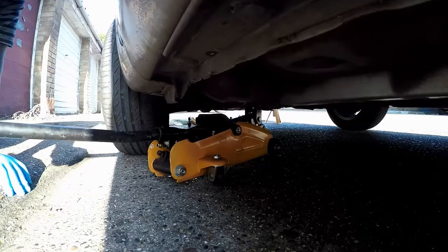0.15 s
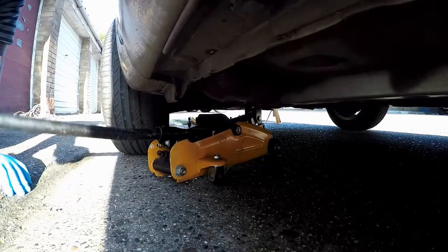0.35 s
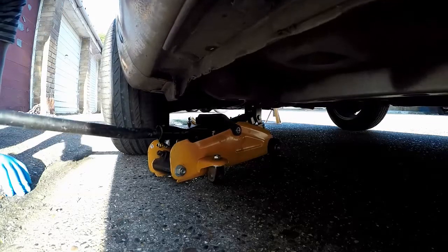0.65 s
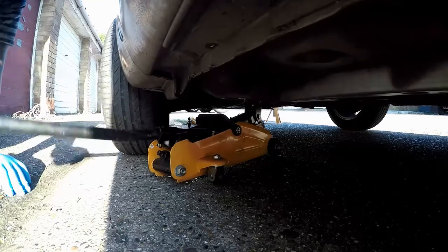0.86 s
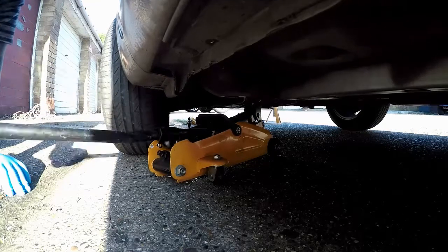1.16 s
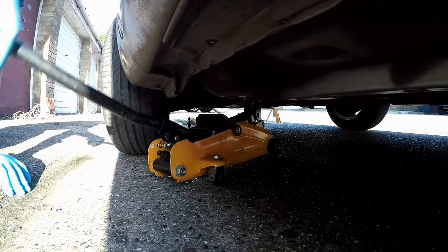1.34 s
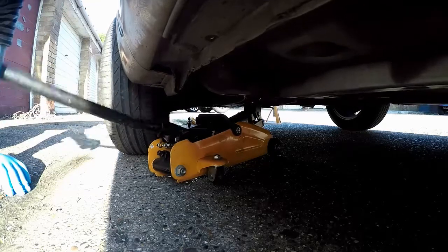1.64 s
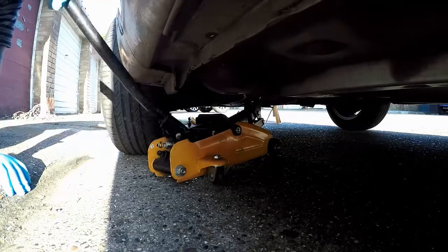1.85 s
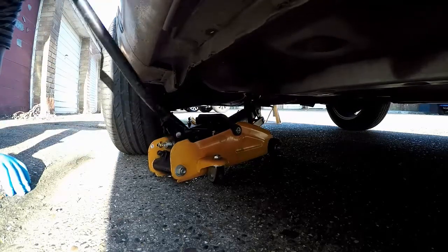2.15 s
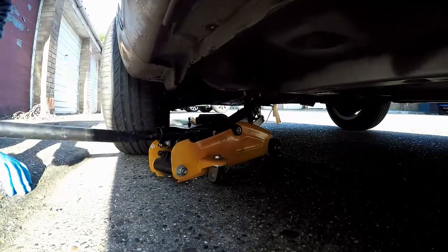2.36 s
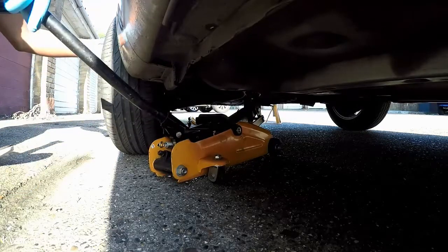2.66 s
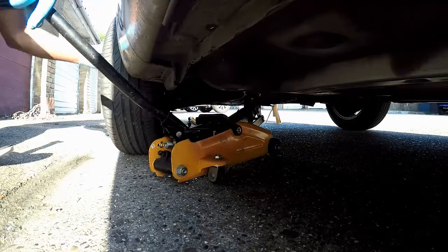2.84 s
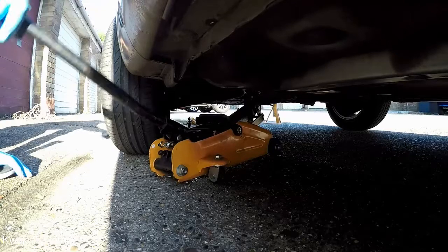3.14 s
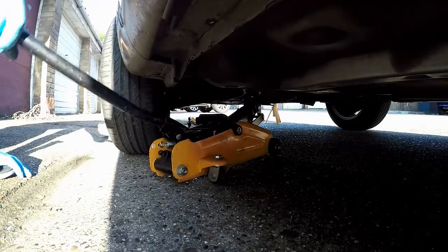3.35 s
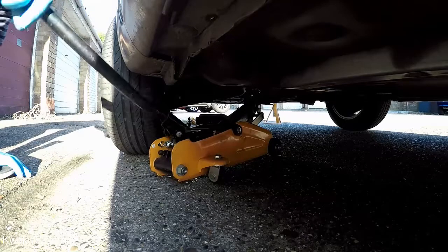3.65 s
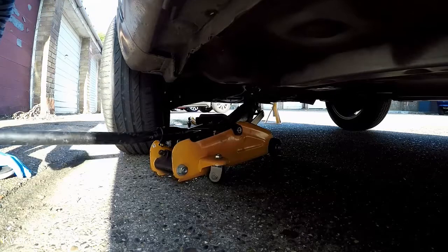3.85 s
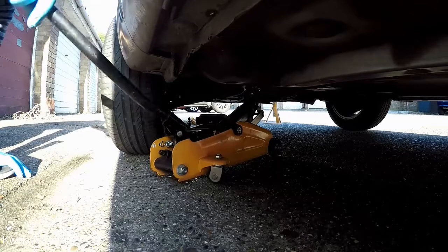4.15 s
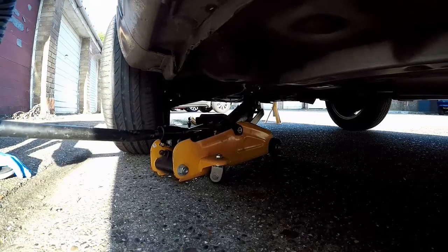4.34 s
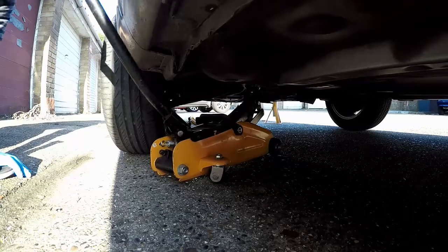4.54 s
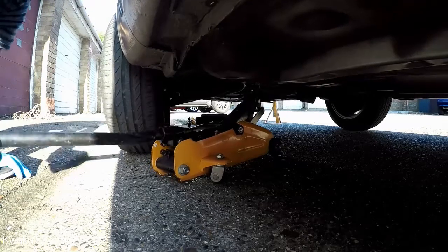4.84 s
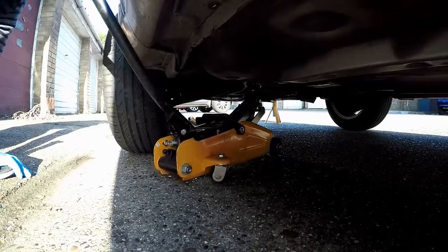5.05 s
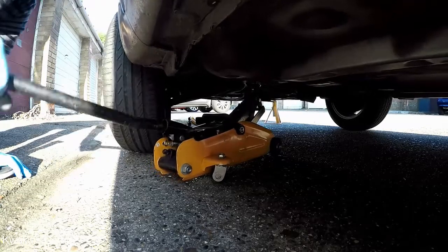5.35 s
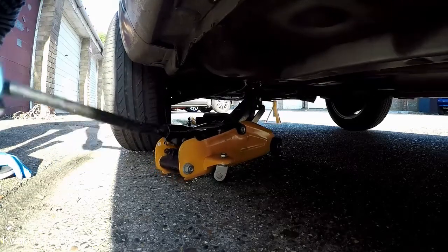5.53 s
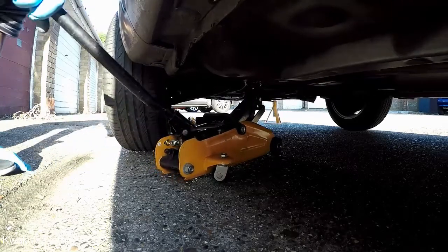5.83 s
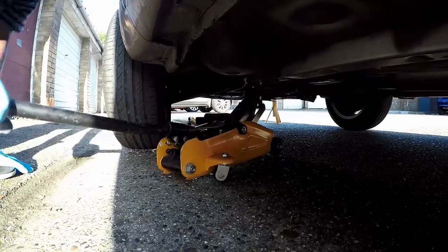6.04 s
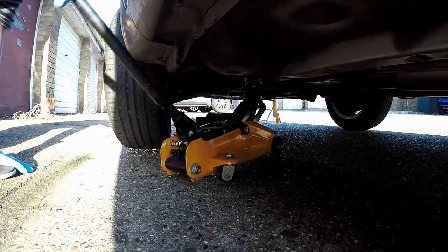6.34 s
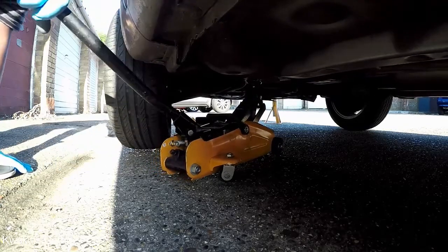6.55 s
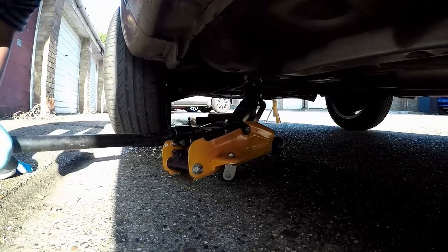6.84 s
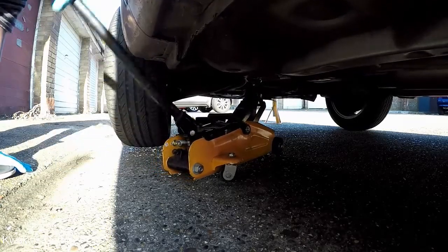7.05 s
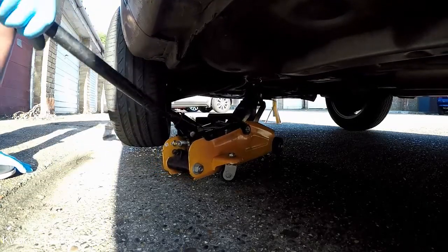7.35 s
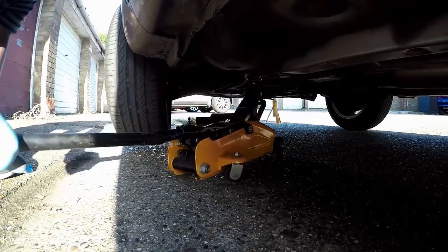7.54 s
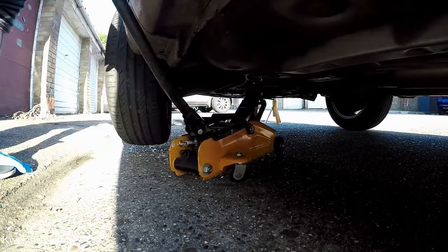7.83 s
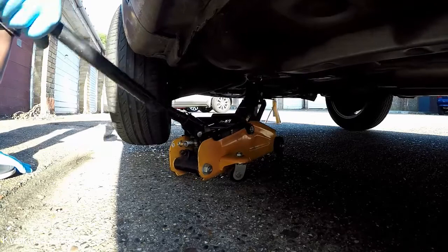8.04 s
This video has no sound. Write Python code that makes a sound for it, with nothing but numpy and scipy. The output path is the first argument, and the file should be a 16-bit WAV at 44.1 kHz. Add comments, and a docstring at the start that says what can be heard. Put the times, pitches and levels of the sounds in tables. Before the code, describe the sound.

Close, dry outdoor sound of a steel trolley jack being pumped under a car, over quiet steady air and a faint dull echo. From 0 to 2.6 s, rapid even strokes come about every quarter second: a rattly clack with a low thump, then a lighter knock and click as the lever swings back, with tiny hollow blips from the valve. From about 2.9 s the rhythm breaks up: soft scuffs, knocks, small clicks and sharper catches, the strongest near 3.75 s. Low, lumpy wind rumbles up from 4.2 s, peaking around 5 s and gone by 5.5 s, with a hard bang at 4.9 s. Clicks cluster near 5.4 s. Loud bangs with short metallic rings land at 6.0, 6.3 and 6.75 s, a barely audible thin squeak between 6.5 and 7 s. A catch and double thudding bang come at 7.4 to 7.55 s, then fading clicks, knocks and a faint scuff until about 8.2 s.

```python
"""Trolley jack under a car

A steel jack is pumped outdoors. Quick idle strokes clack and knock until the saddle meets the car; slower
strokes then bang the handle on its stop and set it ringing. Blows are short noise forces through
minimum-phase frame resonances; rings are damped sines, rubs are clumped random slips.
A gust of low, lumpy noise buffets the microphone over a steady noise bed and a faint echo."""
import sys
import numpy as np
from scipy import signal
from scipy.fft import rfft, irfft
from scipy.io import wavfile
from scipy.ndimage import uniform_filter1d

SR = 44100
rng = np.random.default_rng(int(sys.argv[2]) if len(sys.argv) > 2 else 0)


def output_pcm(signal):
    """Save a mono or channel-first signal as 16-bit PCM at the path in sys.argv[1].

    Samples are clipped to [-1, 1] before scaling.
    """
    pcm = np.clip(np.atleast_2d(signal).T, -1, 1) * 32767
    wavfile.write(sys.argv[1], SR, np.round(pcm).astype(np.int16))


N = 361179  # samples

# Levels in the tables are relative: each layer adds its own gain.
# outdoor background spectrum: (frequency [Hz], level [dB])
AIR_COLOUR = [(60, -3), (130, 5), (300, -7), (700, -13), (1500, -20), (3500, -25.5), (7000, -33),
              (15000, -41)]
AIR_RMS_DB = -48.5
# breeze with one gust: (time [s], level [dB])
WIND_LEVEL = [(0.0, -41.5), (1.34, -43), (1.85, -44.5), (2.39, -43), (4.05, -38.5), (4.19, -34), (4.3, -42),
              (4.42, -31), (4.6, -38), (4.92, -29), (5.03, -18.5), (5.2, -22.5), (5.34, -34.5),
              (5.9, -45.5), (8.19, -45.5)]
# spectrum of air moving on the microphone: (frequency [Hz], level [dB])
WIND_COLOUR = [(10, -12), (30, 7.5), (60, 0), (110, -6.5), (190, -15.5), (300, -29), (600, -48),
               (2000, -76)]
# echo between car floor, ground and garages: (frequency [Hz], t60 [s])
YARD_DECAY = [(150, 1), (500, 1), (1200, 0.93), (2500, 0.4), (5000, 0.28), (11000, 0.039)]

# late blips of the oil valve: (time [s], level [dB])
VALVE_BLIPS = [(1.263, -31.5), (2.15, -29)]
VALVE_HZ, VALVE_T60_S = 825, 0.083

# lever swings back through its free play: (time [s], travel [s], knock [dB], click [dB])
LEVER_RETURNS = [(0.133, .062, -31.5, -33), (0.369, 0.07, -28, -34), (0.653, 0.04, -31.5, -28.5),
                 (0.863, 0.078, -28, -29.5), (1.142, 0.065, -31, -26.5), (1.403, 0.07, -31.5, -27.5),
                 (1.686, 0.068, -28, -27.5), (1.98, 0.091, -27.5, -27.5), (2.371, 0.055, -34.5, -29),
                 (3.023, 0.097, -32, -30), (3.401, 0.085, -33.5, -34), (3.818, 0.12, -40, -29),
                 (4.351, 0.076, -57, -29.5), (5.647, 0.059, -27.5, -31)]
# the pin touches lightly before it seats, sliding all the way
TOUCH_LEAD_S, TOUCH_DB, SLIDE_DB = 0.019, -10.5, -49.5
# the lever bounces once after its knock
REBOUND_S, REBOUND_DB = 0.026, -11
KNOCK_TILT_DB_PER_OCT, CLICK_TILT_DB_PER_OCT, SLIDE_TILT_DB_PER_OCT = -2, 3, -6.5
# slack is taken up with a click just before the stop
SLACK_LEAD_S, SLACK_DB = 0.013, -18.5

# handle scuffs in socket and glove: (time [s], length [s], level [dB], tilt [dB/octave])
SCUFFS = [(2.93, 0.092, -50.5, 0), (3.17, 0.087, -53, -2.5), (3.36, 0.28, -51, -4), (3.76, 0.17, -44, -3.5),
          (4.21, 0.37, -48.5, -3.5), (4.68, 0.54, -49.5, -2), (4.81, 0.18, -44, -3),
          (5.37, 0.23, -43.5, -1), (5.95, 0.486, -50.5, 1.5), (6.67, 0.19, -44, 0), (7.06, 0.098, -49, 0.5),
          (7.49, 0.048, -25.5, 1.5), (7.68, 0.036, -44.5, 2), (8.09, 0.12, -47.5, 2)]
# rubbing spectrum: (frequency [Hz], level [dB])
RUB_COLOUR = [(150, 2), (450, 2.5), (800, 5.5), (1500, 2.5), (2150, 5.5), (2700, 4), (4300, 7.5),
              (7000, -0.5), (10000, -8.5), (15000, -20)]

# damped frame resonances: (frequency [Hz], width [Hz], idle lift [dB], loaded lift [dB])
FRAME_MODES = [(183, 73, 3, 6.5), (463, 53, 7, 4), (807, 82, 2.5, -2.5), (1137, 90, 1, 3),
               (1428, 470, 4, -3), (1920, 69, 3.5, 5), (2170, 220, -4.5, 7.5), (2593, 88, 0.5, -2.5),
               (2930, 75, 1.5, 3.5), (3450, 79, 0.5, 3.5), (4090, 380, -4.5, -2), (5050, 400, 0.5, -2),
               (5910, 190, 4, -1), (9700, 1300, 4, -2.5)]
LOADING_S = (2.7, 5.2)  # start and end of the car's weight coming onto the saddle
# decay of a blow in the frame: (frequency [Hz], t60 [s])
FRAME_DECAY = [(150, 0.13), (400, 0.094), (900, 0.071), (2000, 0.064), (4500, 0.038), (10000, 0.034)]
# bounce of the jack on the ground: (frequency [Hz], level [dB], t60 [s])
BOUNCE_MODES = [(38.3, 2.5, 0.17), (72.3, 3, 0.13), (118.4, -5, 0.11), (184, -13, 0.046)]
# hollow ring of the handle's socket: (frequency [Hz], level [dB], t60 [s])
SOCKET_MODES = [(804, -6, 0.074), (1453, -13.5, 0.036), (2470, -9, 0.066)]

# free ring of the handle tube: (frequency [Hz], level [dB], t60 [s])
HANDLE_MODES = [(398, -18.5, 0.5), (555, -22.5, 0.87), (950, -19, 0.34), (1405, -11, 0.28),
                (1890, -16.5, 0.32), (2148, -4.5, 0.29), (2783, -8.5, 0.2), (3405, -15, 0.48),
                (3740, -14.5, 0.47), (4100, -21, 0.38), (4400, -23, .4), (4580, -22, 0.21),
                (5180, -17.5, 0.53)]
# first bending mode of the tube: (frequency [Hz], level [dB], t60 [s])
BEND_MODE = [(189, 1, 0.39)]
# crowded weaker modes of the tube: (frequency [Hz], level [dB])
SHIMMER_COLOUR = [(300, 17), (1500, 0), (2100, 11), (5300, 10.5), (5500, -16.5)]
SHIMMER_DB, SHIMMER_T60_S = -5, 0.42
STIR_DB = -30.5  # ring set off by a clack or knock, relative to its level

# handle snaps in its socket under load: (time [s], level [dB], tilt [dB/octave])
CLICKS = [(3.453, -37.5, 1.5), (3.543, -42.5, 3), (3.805, -36, 2.5), (3.914, -37, -1), (3.995, -35, 5),
          (4.056, -40.5, 1.5), (4.354, -39.5, 3), (4.397, -48, 3.5), (4.49, -39.5, 0.5), (4.546, -43, 1.5),
          (4.617, -46.5, 3.5), (4.822, -41.5, -1), (4.986, -37, 6), (5.07, -34, 2.5), (5.318, -44, 5),
          (5.349, -42, 4), (5.412, -34.5, 2.5), (5.44, -28.5, 1.5), (5.493, -34, 2.5), (5.557, -34, 4),
          (6.154, -33, 3), (6.246, -30.5, 1.5), (6.312, -38, 7.5), (6.438, -35, 9), (6.695, -37, 3.5),
          (6.96, -32.5, 6.5), (7.034, -31.5, 0.5), (7.125, -36.5, 6), (7.653, -27.5, 7.5),
          (7.771, -36.5, 5.5), (7.856, -37, 6.5)]
# frame rocks on its wheels as the handle turns round: (time [s], level [dB])
KNOCKS = [(0.913, -27), (2.128, -35), (2.493, -29), (3.059, -32.5), (3.294, -33), (3.664, -37),
          (4.851, -32), (5.013, -24.5), (5.745, -25.5), (6.201, -33.5), (6.487, -30.5), (7.177, -26.5),
          (7.531, -26.5), (7.794, -29.5), (7.897, -31)]
# lever ends an idle stroke: (time [s], level [dB], tilt [dB/octave], ping [Hz], thud [dB])
CLACKS = [(0.063, -28, -2.5, 1430, -26.5), (0.303, -27.5, -2.5, 1600, -26), (0.56, -27, -3.5, 1460, -28.5),
          (0.799, -25, -3.5, 850, -22), (1.05, -25, -2.5, 740, -26.5), (1.317, -23.5, -3.5, 6100, -19.5),
          (1.59, -24.5, -4.5, 2000, -27), (1.886, -24.5, -3, 9900, -24), (2.202, -24, -3, 2550, -26),
          (2.571, -24.5, -5, 2740, -26)]
# raised handle catches in its socket: (time [s], level [dB], tilt [dB/octave], ping [Hz], thud [dB])
CATCHES = [(3.258, -27, 0.5, 9700, -30.5), (3.626, -24.5, 0, 9700, -54), (3.744, -16.5, 1.5, 1680, -37),
           (4.085, -28, 0.5, 1000, -25), (4.576, -30.5, -0.5, 710, -26), (7.428, -20, -1.5, 1270, -59)]
# handle meets its stop:
# (time [s], level [dB], tilt [dB/octave], ping [Hz], thud [dB], ring [dB], lifted note [Hz])
BANGS = [(4.907, -14.5, 1.5, 4450, -34, -48.5, 3405), (5.978, -15.5, 2.5, 670, -60, -35.5, 2148),
         (6.032, -24, -0.5, 2120, -36.5, -44.5, 2783), (6.263, -15.5, 2, 4560, -17, -30.5, 1890),
         (6.755, -15, 2.5, 1790, -49, -41, 3405), (7.495, -20, 2, 2150, -20, -29.5, 1405),
         (7.551, -17, 2.5, 3440, -19, -40.5, 2148)]
# contact spectra: (frequency [Hz], level [dB])
CLICK_COLOUR = [(60, -24.5), (200, 8.5), (340, 5.5), (500, 1.5), (780, 10), (1100, 1), (1450, -2.5),
                (2200, -5.5), (3400, -3.5), (5000, -9), (6800, -14.5), (10000, -21.5), (14500, -29)]
KNOCK_COLOUR = [(60, 9), (200, 0.5), (340, -2), (500, 0.5), (780, 1.5), (1100, -5.5), (1450, -1.5),
                (2200, -6), (3400, -3.5), (5000, -9), (6800, -17), (10000, -24), (14500, -31)]
CLACK_COLOUR = [(60, -35), (200, -6.5), (340, -7.5), (500, -7.5), (780, 3.5), (1100, -2.5), (1450, -5),
                (2200, 0), (3400, 0.5), (5000, 1), (6800, -5.5), (10000, -5), (14500, -1)]
CATCH_COLOUR = [(60, -21), (200, -0.5), (340, -3.5), (500, -2.5), (780, 4), (1100, -3), (1450, -5.5),
                (2200, -2.5), (3400, 0), (5000, -7), (6800, -12.5), (10000, -18.5), (14500, -16.5)]
BANG_COLOUR = [(60, -18.5), (200, 8.5), (340, -4.5), (500, -7), (780, 4), (1100, -2), (1450, 0.5),
               (2200, -6), (3400, -4.5), (5000, -8), (6800, -14.5), (10000, -23.5), (14500, -27.5)]
HIT_SIZE, HIT_PEAK_S = 5120, 0.02  # length [samples], place of the bite in it
# ping of the struck part; light contacts draw theirs from a range
PING_DB, PING_OCTAVES = 8, 0.16
KNOCK_PING_HZ, CLICK_PING_HZ, GRAIN_PING_HZ = (570, 1630), (2000, 5600), (870, 7040)
EDGE_HZ = 15650  # output band limit


def amp(db):
    """dB to gain."""
    return 10 ** (np.asarray(db) / 20)


def evened(x):
    """Scales to unit rms."""
    return x / np.sqrt(np.mean(x ** 2) + 1e-20)


def decay(t, t60_s):
    """Exponential fall of 60 dB in t60_s."""
    return np.exp(-np.log(1000) * t / t60_s)


def read(points, hz):
    """Spectrum joined by straight lines over log frequency."""
    f, value = np.transpose(points)
    return np.interp(np.log(hz + 1), np.log(f + 1), value)


def level(curve):
    """dB curve as a gain for every sample."""
    s, db = np.transpose(curve)
    return amp(np.interp(np.arange(N) / SR, s, db))


def add(mix, s, sound):
    """Adds a sound into the mix at a time, cut at the end."""
    part = mix[max(0, round(s * SR)):][:len(sound)]
    part += sound[:len(part)]


def coloured(x, points):
    """Gives x a spectrum, at unit rms."""
    gain = amp(read(points, np.fft.rfftfreq(len(x), 1 / SR)))
    return evened(irfft(rfft(x) * gain, len(x)))


def drift(per_s):
    """Smooth random curve of unit rms: noise averaged twice."""
    size = int(SR / per_s)
    once = uniform_filter1d(rng.standard_normal(N), size, mode="wrap")
    return evened(uniform_filter1d(once, size, mode="wrap"))


def causal(x, db):
    """Minimum-phase filter: resonances ring only after the blow."""
    cepstrum = irfft(np.log(amp(db)))
    half = len(cepstrum) // 2
    cepstrum[1:half] *= 2
    cepstrum[half + 1:] = 0
    return irfft(rfft(x) * np.exp(rfft(cepstrum)))


def dying_noise(decays, size):
    """Crowded modes or echoes: each band dies at its own speed, with like energy per Hz."""
    t, hz = np.arange(size) / SR, np.fft.rfftfreq(size, 1 / SR)
    centres, t60s = np.transpose(decays)
    noise, out = rfft(rng.choice([-1., 1.], size)), np.zeros(size)
    for share, t60_s in zip(np.eye(len(centres)), t60s):
        weight = read(np.transpose([centres, share]), hz)
        out += irfft(noise * weight, size) * evened(decay(t, t60_s))
    return evened(out) / np.sqrt(size)


def ring(modes, seconds, detune):
    """Damped sines with random polarity and slightly random pitch."""
    t, out = np.arange(int(seconds * SR)) / SR, 0
    for (hz, db, t60_s), (pitch, side) in zip(modes, rng.standard_normal((len(modes), 2))):
        sine = np.sin(2 * np.pi * hz * (1 + detune * pitch) * t)
        out = out + np.sign(side) * amp(db) * sine * decay(t, t60_s)
    return out


def air():
    """Steady outdoor background: coloured noise."""
    return amp(AIR_RMS_DB) * coloured(rng.standard_normal(N), AIR_COLOUR)


def wind(gain_db, lumpy_db):
    """Low, lumpy buffeting: coloured noise under a drifting gain."""
    lumps = amp(gain_db + lumpy_db * drift(8.2))
    return lumps * level(WIND_LEVEL) * coloured(rng.standard_normal(N), WIND_COLOUR)


def yard(x, wet_db, delay_s):
    """Faint, dull echo: convolution with dying noise."""
    tail = np.zeros(SR)
    add(tail, delay_s, dying_noise(YARD_DECAY, SR))
    dull = signal.lfilter(*signal.butter(1, 5000, fs=SR), tail)
    return amp(wet_db) * signal.oaconvolve(x, dull)[:N]


def squeak(s, length_s, note_hz, db, width_hz):
    """A faint, narrow tone: noise through one narrow resonance, swelling and fading."""
    out, size = np.zeros(N), int(length_s * SR)
    peak = signal.iirpeak(note_hz, note_hz / width_hz, fs=SR)
    note = signal.lfilter(*peak, rng.standard_normal(size))
    add(out, s, amp(db) * evened(note) * np.hanning(size))
    return out


def valve(return_db):
    """Oil valve: a damped sine halfway through every return before loading, and at the late blips."""
    idle = [(s + travel_s / 2, return_db) for s, travel_s, *_ in LEVER_RETURNS if s < LOADING_S[0]]
    out = np.zeros(N)
    for s, db in list(VALVE_BLIPS) + idle:
        add(out, s, amp(db) * ring([(VALVE_HZ, 0, VALVE_T60_S)], 0.25, detune=0.03))
    return out


def frame(hz, s, spot_db=0):
    """Frame resonances in dB, changing as the weight comes on; spot_db scatters them at random."""
    load = np.interp(s, LOADING_S, [0, 1])
    scatter = spot_db * rng.standard_normal(len(FRAME_MODES))
    total = 0
    for (f, width, idle_db, loaded_db), spot in zip(FRAME_MODES, scatter):
        lift = (1 - load) * idle_db + load * loaded_db + spot
        total = total + lift / (1 + (2 * (hz - f) / width) ** 2)
    return total


def ping(hz, ping_hz):
    """Narrow lift, in dB, around the note of the struck part."""
    return PING_DB / (1 + (np.log2((hz + 1) / ping_hz) / PING_OCTAVES) ** 2)


def octaves_from_2k(hz):
    """Octaves from 2 kHz, held below 500 Hz, for spectral tilt."""
    return np.log2(np.maximum(hz, 500) / 2000)


def grain_bodies(count, tilt_db):
    """Slips on different spots ring the frame with different notes and brightness."""
    hz = np.fft.rfftfreq(HIT_SIZE, 1 / SR)
    notes = np.geomspace(*GRAIN_PING_HZ, count)
    tilts = rng.permutation(np.linspace(-tilt_db, tilt_db, count))
    return [causal(dying_noise(FRAME_DECAY, HIT_SIZE), ping(hz, note) + tilt * octaves_from_2k(hz))
            for note, tilt in zip(notes, tilts)]


def rub(scuffs, gain_db, grains_per_s, spread_db, smooth):
    """Tiny slips in uneven clumps, swelling and fading with each scuff."""
    sizes = amp(spread_db * np.minimum(rng.exponential(1, N), 3))
    slips = (rng.random(N) < grains_per_s / SR) * sizes * rng.choice([-1., 1.], N)
    bodies = grain_bodies(count=8, tilt_db=2.0)
    spot = rng.integers(0, len(bodies), N)
    grains = sum(signal.oaconvolve(slips * (spot == k), body)[:N] for k, body in enumerate(bodies))
    clumps = amp(3.5 * drift(110))
    friction = (evened(grains) + smooth * rng.standard_normal(N)) * clumps
    out = np.zeros(N)
    for s, length_s, db, tilt_db in scuffs:
        part = friction[round(s * SR):][:int(length_s * SR)]
        hz = np.fft.rfftfreq(len(part), 1 / SR)
        tilted = [(f, band_db + tilt_db * np.log2(f)) for f, band_db in RUB_COLOUR]
        colour = np.transpose([hz, read(tilted, hz) + frame(hz, s)])
        add(out, s, amp(db + gain_db) * coloured(part, colour) * signal.windows.tukey(len(part), 0.5))
    return out


def thuds(rows, modes, gain_db, shudder_db, shudder_t60_s):
    """Jack bounces on its wheels (damped sines) and shudders (dying low noise)."""
    out = np.zeros(N)
    band = signal.butter(2, (110, 280), "bandpass", fs=SR, output="sos")
    for s, _, _, _, thud_db, *_ in rows:
        bounce = ring(modes, 0.25, detune=0.03)
        low = signal.sosfilt(band, rng.standard_normal(len(bounce)))
        shudder = evened(low) * decay(np.arange(len(low)) / SR, shudder_t60_s)
        add(out, s, amp(thud_db + gain_db) * (bounce + amp(shudder_db) * shudder))
    return out


def knocked(knocks, modes, gain_db, detune):
    """Every knock sets a part ringing: the socket, or the whole jack on its wheels."""
    out = np.zeros(N)
    for s, db, _ in knocks:
        add(out, s, amp(db + gain_db) * ring(modes, 0.25, detune))
    return out


def handle(light_blows, gain_db, note_db, bend_db):
    """Tube rings after the stop with one note lifted, faintly after light blows; bangs also flex it."""
    out, t = np.zeros(N), np.arange(SR // 2) / SR
    strikes = [(s, ring_db, note_hz) for s, *_, ring_db, note_hz in BANGS]
    strikes += [(s, db + STIR_DB, 0) for s, db, *_ in light_blows]  # 0 Hz: no lifted note
    for s, ring_db, note_hz in strikes:
        modes = [(hz, db + note_db * (abs(hz - note_hz) < hz / 20), t60_s)
                 for hz, db, t60_s in HANDLE_MODES]
        shimmer = coloured(rng.standard_normal(len(t)), SHIMMER_COLOUR) * decay(t, SHIMMER_T60_S)
        tube = ring(modes, 0.5, detune=0.001)
        add(out, s, amp(ring_db + gain_db) * (tube + amp(SHIMMER_DB) * shimmer))
    bend = ring(BEND_MODE, 0.5, detune=0)
    for s, _, _, _, thud_db, *_ in BANGS:
        add(out, s, amp(thud_db + bend_db) * bend)
    return out


def returns():
    """Rows of knocks, clicks, slides: each return knocks, rebounds, slides, touches and seats."""
    knocks, clicks, slides = [], [], []
    for s, travel_s, knock_db, click_db in LEVER_RETURNS:
        seat_s = s + travel_s
        knocks.append((s, knock_db, KNOCK_TILT_DB_PER_OCT))
        knocks.append((s + REBOUND_S, knock_db + REBOUND_DB, 0))
        clicks.append((seat_s - TOUCH_LEAD_S, click_db + TOUCH_DB, CLICK_TILT_DB_PER_OCT))
        clicks.append((seat_s, click_db, CLICK_TILT_DB_PER_OCT))
        slides.append((s, travel_s, SLIDE_DB, SLIDE_TILT_DB_PER_OCT))
    return knocks, clicks, slides


def pinged(rows, range_hz):
    """Gives each light contact a random note within a range."""
    low, high = range_hz
    return [(*row, low * (high / low) ** u) for row, u in zip(rows, rng.random(len(rows)))]


def hit(s, colour, tilt_db, ping_hz, contact_s, body_db, scrape_db, scrape_s):
    """Rough steel slides in jerks, bites for a few ms, shakes the frame and rattles loose."""
    clock = np.arange(HIT_SIZE) / SR
    t, hz = clock - HIT_PEAK_S, np.fft.rfftfreq(HIT_SIZE, 1 / SR)
    rough = uniform_filter1d(rng.standard_normal(HIT_SIZE), size=3)  # sliding is duller than biting
    jerks = amp(4 * evened(uniform_filter1d(rng.standard_normal(HIT_SIZE), size=130)))
    # the bite is a cluster of tiny contacts
    bite = np.exp(-abs(t) / contact_s) * rng.standard_normal(HIT_SIZE) * jerks
    slide = amp(scrape_db) * jerks * np.clip(4 * (t + scrape_s) / scrape_s, 0, 1) * (t < 0)
    late_s = rng.uniform(0.0013, 0.0542, size=2)
    rattle = amp(-28.5) * sum(np.exp(-abs(t - late) / contact_s) for late in late_s)
    force = (bite + (slide + rattle) * rough) / np.linalg.norm(bite)
    body = dying_noise(FRAME_DECAY, HIT_SIZE) * np.minimum(clock / contact_s, 1)
    add(force, HIT_PEAK_S - contact_s / 2, amp(body_db) * body)
    # each blow lands on another spot, so it favours other resonances
    frame_db = frame(hz, s, spot_db=3)
    tone_db = read(colour, hz) + frame_db + ping(hz, ping_hz) + tilt_db * octaves_from_2k(hz)
    sound = causal(force, tone_db)
    return evened(sound) * np.sqrt(SR / 50 / HIT_SIZE)  # energy of unit rms over 20 ms


def hits(rows, colour, gain_db, contact_s, body_db, scrape_db, scrape_s):
    """Plays every contact of one kind, its bite on the listed time."""
    out = np.zeros(N)
    for s, db, tilt_db, ping_hz, *_ in rows:
        sound = hit(s, colour, tilt_db, ping_hz, contact_s, body_db, scrape_db, scrape_s)
        add(out, s - HIT_PEAK_S, amp(db + gain_db) * sound)
    return out


def scene():
    """Air, wind, and the jack with its echo, alike in both channels."""
    knocks, clicks, slides = returns()
    knocks += [(s, db, KNOCK_TILT_DB_PER_OCT) for s, db in KNOCKS]
    clicks += list(CLICKS)
    clicks += [(s - SLACK_LEAD_S, db + SLACK_DB, CLICK_TILT_DB_PER_OCT) for s, db, *_ in BANGS]

    low = wind(gain_db=1.5, lumpy_db=3.5)
    low += thuds(list(CLACKS) + list(CATCHES) + list(BANGS), BOUNCE_MODES,
                 gain_db=-1, shudder_db=-3.5, shudder_t60_s=0.12)
    low += knocked(knocks, BOUNCE_MODES, gain_db=-5.0, detune=0.05)

    jack = squeak(s=6.5, length_s=0.5, note_hz=1975, db=-53, width_hz=35)
    jack += valve(return_db=-36)
    jack += rub(list(SCUFFS) + slides, gain_db=5.0, grains_per_s=500, spread_db=8.0, smooth=0.05)
    jack += knocked(knocks, SOCKET_MODES, gain_db=-2.5, detune=0.03)
    jack += handle(list(CLACKS) + knocks, gain_db=5.5, note_db=6, bend_db=-4.5)
    jack += hits(pinged(clicks, CLICK_PING_HZ), CLICK_COLOUR, gain_db=2.0, contact_s=0.0017,
                 body_db=7.0, scrape_db=-24.5, scrape_s=0.027)
    jack += hits(pinged(knocks, KNOCK_PING_HZ), KNOCK_COLOUR, gain_db=-2.5, contact_s=0.0014,
                 body_db=7.0, scrape_db=-34, scrape_s=0.01)
    jack += hits(CLACKS, CLACK_COLOUR, gain_db=3.5, contact_s=0.0026,
                 body_db=3.0, scrape_db=-12, scrape_s=0.015)
    jack += hits(CATCHES, CATCH_COLOUR, gain_db=2.5, contact_s=0.0012,
                 body_db=3.5, scrape_db=-40, scrape_s=0.036)
    jack += hits(BANGS, BANG_COLOUR, gain_db=0.5, contact_s=0.002924,
                 body_db=13.0, scrape_db=-23.5, scrape_s=0.072)

    mono = air() + low + jack + yard(jack, wet_db=-23, delay_s=0.013)
    return np.array([mono, mono])


def record(dry):
    """Full-scale limit, then the band limit."""
    lowpass = signal.firwin(255, EDGE_HZ, window=("kaiser", 8), fs=SR)
    return signal.oaconvolve(np.clip(dry, -1, 1), lowpass[None], "same", axes=1)


dry = scene()
out = record(dry)
output_pcm(out)
```